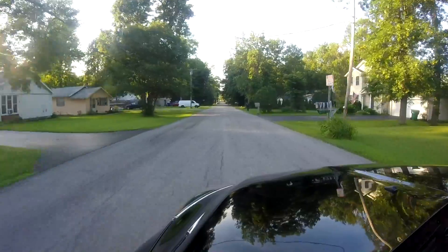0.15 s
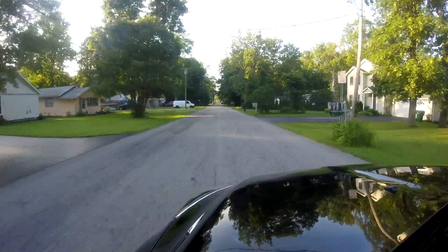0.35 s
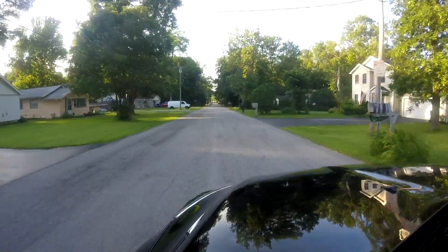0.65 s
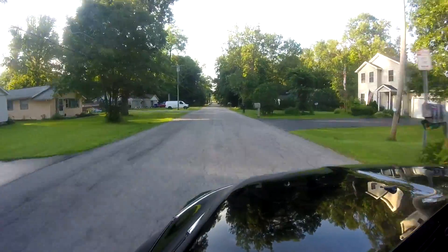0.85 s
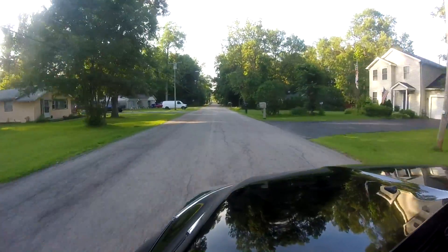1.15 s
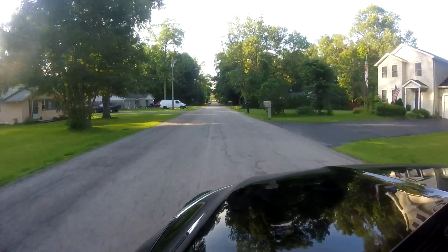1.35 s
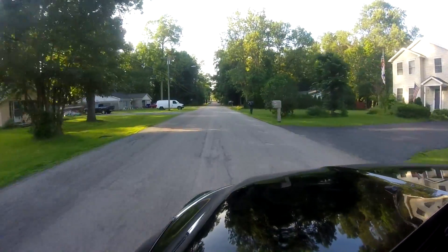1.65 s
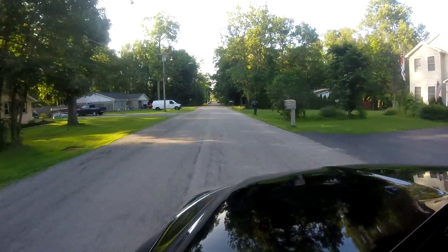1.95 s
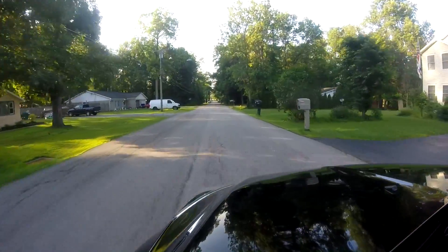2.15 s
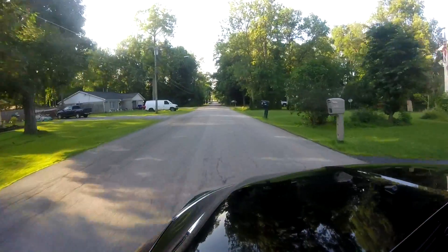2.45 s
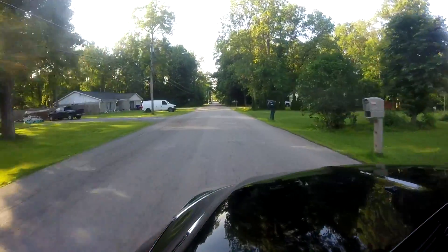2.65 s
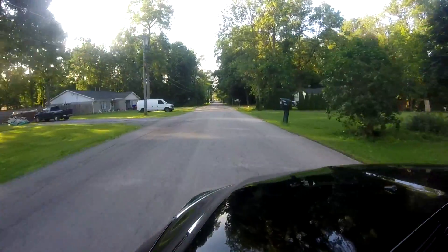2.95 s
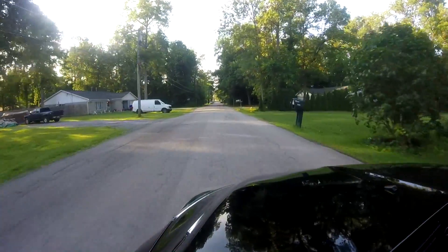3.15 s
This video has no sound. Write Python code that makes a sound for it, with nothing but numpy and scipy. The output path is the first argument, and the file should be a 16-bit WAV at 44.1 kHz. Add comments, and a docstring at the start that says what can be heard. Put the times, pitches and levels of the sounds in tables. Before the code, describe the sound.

A car engine accelerates hard along a quiet street, its intake roaring and turbo whistling upward. It backs off with a quick flutter, pops softly and settles into a lower drone. A microphone on the bodywork also catches wind and tyre noise.

```python
"""Turbo car pulling hard

Heard from a camera on the car's body, in a quiet street. Air gulped through the airbox roars and
the turbo whistles up; the throttle eases and boost spills back through the intake in short hoots.
The exhaust burbles down into the next gear; the firing harmonics drone on over tyre and wind noise."""
import sys
import numpy as np
from scipy import signal
from scipy.fft import rfft, irfft
from scipy.io import wavfile
from scipy.ndimage import uniform_filter1d

SR = 44100
rng = np.random.default_rng(int(sys.argv[2]) if len(sys.argv) > 2 else 0)


def put_to_file(sound):
    """Save the sound as 16-bit audio at rate SR, in the file named by the first command-line argument."""
    columns = np.atleast_2d(sound).T  # one column per channel
    safe = np.clip(columns, -1, 1)
    whole_steps = np.round(safe * 32767)
    wavfile.write(sys.argv[1], SR, whole_steps.astype(np.int16))


N = 145089
T = np.arange(N) / SR
HZ = np.fft.rfftfreq(N, 1 / SR)

# Cylinder firing (time [s], rate [Hz])
FIRING_HZ = [(0, 79.24), (.12, 80.77), (.37, 87.13), (.55, 93.3), (.77, 98.43), (1, 102.2), (1.2, 104.7),
             (2.1, 105.2), (2.25, 102.8), (2.5, 93.3), (2.6, 87.4), (2.75, 71.9), (2.87, 63.42),
             (3.06, 69.3), (3.18, 65.3), (3.29, 67.85)]
# Firing harmonics (time [s], 1st [dB], 2nd [dB], 3rd [dB])
HARMONICS_DB = [(0, -17.5, -20, -28.5), (.14, -16.5, -17, -31.5), (.4, -16, -22, -24.5),
                (.77, -19, -26, -33), (1.1, -22.5, -28, -26), (1.3, -36.5, -30, -29.5),
                (1.43, -23.5, -36, -47), (1.6, -18, -31, -34.5), (1.95, -18, -34, -52),
                (2.12, -18, -25, -26.5), (2.3, -23, -29, -37), (2.55, -18.5, -32, -52),
                (2.75, -18, -26, -34), (2.9, -16.5, -22, -30), (2.99, -23.5, -15, -24),
                (3.08, -27.5, -11, -22.5), (3.18, -18, -13, -22), (3.29, -17.5, -10.5, -22)]
# Other engine orders, throttle open (frequency [Hz], level re 3rd harmonic [dB])
ORDERS_OPEN_DB = [(120, -15), (265, -6.5), (335, -0.5), (375, 2), (405, -6), (450, -10), (500, -9.5),
                  (690, -11), (900, -24.5)]
# Other engine orders, throttle eased (frequency [Hz], level re 3rd harmonic [dB])
ORDERS_EASED_DB = [(120, -2), (270, -22), (335, -4), (395, -23.5), (470, -31.5), (560, -19), (680, -18.5),
                   (900, -29)]
# Intake envelopes before trim (time [s], roar [dB], hiss [dB])
INTAKE_DB = [(0, -40, -48), (.16, -27, -44), (.36, -23.5, -41), (.58, -20, -38), (0.88, -19, -37),
             (1.13, -19.5, -38), (1.24, -27, -46.5), (1.3, -22.5, -46), (1.32, -30, -47),
             (1.38, -25.5, -47), (1.42, -30.5, -43.5), (2.11, -30.5, -45.5), (2.57, -35, -51.5),
             (3.03, -36, -53.5), (3.065, -47.5, -56.5), (3.27, -50.5, -54.5)]
# Roar spectrum, throttle open (frequency [Hz], relative level [dB])
ROAR_OPEN_DB = [(250, 1.5), (430, 3), (520, -12), (700, 2.5), (810, -9.5), (940, -15), (1040, -7),
                (1300, -2), (1400, -7.5), (1750, 2), (2100, 0.5), (2400, -13), (2950, -20.5), (4500, -56)]
# Roar spectrum, throttle eased (frequency [Hz], relative level [dB])
ROAR_EASED_DB = [(250, -0.5), (560, 0.5), (700, 4), (850, -12.5), (1250, -5.5), (1400, -10.5), (1750, -2),
                 (2150, 2), (2450, -8.5), (2950, -18), (4500, -32.5)]
# Hiss spectrum (frequency [Hz], relative level [dB])
HISS_SPECTRUM_DB = [(2400, -14.5), (3300, 0.5), (4200, -1), (5300, -3), (6800, -6.5), (7850, -14),
                    (8550, -8.5), (9200, -17.5), (10500, -24), (14500, -38)]
# Airbox and pipe resonances (centre [Hz], half-width [Hz], lift open [dB], lift eased [dB])
DUCT_MODES = [(452, 7.7, 7.5, 7.5), (558, 12, 12, 8), (689, 16, 5, 6), (1016, 16, 10.5, 9),
              (1157, 36, 4.5, 4), (1255, 24, 9, 6), (1470, 28, 11, 12), (1697, 28, 4.5, 5.5),
              (1806, 40, 2, 2), (1990, 62, 3, -1.5), (2087, 18, 4, 6), (2595, 21, 4, 2.5),
              (3184, 36, 10, 11), (3388, 40, 9.5, 8), (3760, 110, 2, 7.5), (4110, 42, 6, 8.5),
              (4440, 51, 8, 2), (5254, 80, 10, 4.5), (6450, 50, 7, 0.5), (6600, 89, 4, 6)]
# Compressor (time [s], pitch [Hz], whistle [dB], rush before duct lift [dB])
TURBO_TRACK = [(0, 4120, -71, -49), (.1, 4420, -58, -47), (.22, 5150, -62, -45), (.42, 6210, -76, -49),
               (.47, 8070, -68, -67), (.52, 8250, -56, -66), (.66, 8630, -53, -70), (.77, 8900, -52, -71),
               (.93, 9000, -60, -67), (1.19, 8100, -51, -72), (1.25, 7770, -77, -72),
               (1.45, 6484, -65, -54), (1.7, 5354, -55, -65), (1.95, 4510, -62, -53),
               (2.07, 4175, -54, -43), (2.25, 4010, -49, -54), (2.62, 3454, -69, -66),
               (2.77, 3170, -49, -63), (2.87, 3028, -78, -74)]
# Tyre and wind rumble spectrum (frequency [Hz], relative level [dB])
RUMBLE_SPECTRUM_DB = [(10, -16), (28, 3.5), (60, 1.5), (100, -3), (140, -2), (200, -5.5), (270, -11),
                      (340, -12), (450, -14), (680, -22.5), (900, -30.5), (1250, -33.5), (4000, -48.5)]
# Rumble envelope (time [s], level [dB])
RUMBLE_DB = [(0, -21.5), (.4, -22), (.9, -18), (1.15, -20.5), (1.33, -24), (1.55, -23), (2, -19),
             (2.3, -18.5), (2.7, -19.5), (3.05, -20.5), (3.29, -20.5)]
# Spectrum of air over the body (frequency [Hz], relative level [dB])
WIND_SPECTRUM_DB = [(200, -12.5), (450, -3.5), (680, -2), (850, -13), (1250, -15), (1550, -19.5),
                    (2050, -10), (2400, -27), (7000, -41), (14000, -68)]
# Airbox whistles (centre [s], half-length [s], pitch [Hz], level [dB])
AIRBOX_CHIRPS = [(0.296, .032, 1477, -23.5), (0.381, 0.024, 1682, -23.5), (0.436, 0.015, 2020, -26)]
# Intake flutter (centre [s], half-length [s], pitch [Hz], level [dB])
FLUTTER_HOOTS = [(.85, 0.027, 423, -24), (.924, 0.021, 438.1, -13.5), (.963, 0.024, 426.6, -25),
                 (1.003, 0.02, 383.9, -21.5), (1.083, 0.034, 434.2, -15), (1.148, 0.0073, 415.3, -14),
                 (1.185, 0.019, 438.4, -12), (1.214, 0.013, 439.5, -8), (1.25, 0.0039, 431, -15),
                 (1.28, 0.018, 451, -15.5), (1.304, 0.0025, 460.7, -9.5), (1.319, 0.0068, 430, -12),
                 (1.366, 0.011, 395, -21), (1.404, 0.016, 449, -15)]
# Exhaust pops (onset [s], pitch [Hz], peak [dB])
EXHAUST_POPS = [(0.851, 87, -9.5), (2.174, 104.2, -4.5), (2.215, 136.3, -9.5), (2.255, 108, -5),
                (2.285, 136, -12.5), (2.375, 140.4, -7), (2.454, 122, -7), (2.733, 66.5, -12)]
# Pipe tones (centre [s], half-length [s], pitch [Hz], bandwidth [Hz], level [dB])
PIPE_TONES = [(1.295, 0.049, 520, 75, -25), (2.1, 0.45, 3750, 190, -44.5), (2.13, 0.3, 6685, 110, -54.5),
              (2.88, 0.12, 2220, 125.2, -39.5), (3.025, 0.031, 1900, 300, -38.5)]
# Air spits (centre [s], half-length [s], level [dB])
THROTTLE_SPITS = [(1.288, .018, -49.5), (1.37, 0.017, -46)]
# Spit spectrum (frequency [Hz], relative level [dB])
SPIT_SPECTRUM_DB = [(1000, -34), (5000, -10), (7000, -3), (8800, -6), (10000, -20), (14000, -29)]


def amp(db):
    """Decibels to gain."""
    return 10 ** (np.asarray(db) / 20)


def unit(x):
    """Scale to rms 1."""
    return x / np.sqrt(np.mean(x ** 2) + 1e-20)


def curves(table):
    """Value columns of a time table, per sample."""
    time_s, *columns = np.transpose(table)
    return [np.interp(T, time_s, column) for column in columns]


def colour(table, hz=HZ):
    """Spectrum in dB, interpolated over log frequency."""
    points_hz, db = np.transpose(table)
    return np.interp(np.log(hz + 1), np.log(points_hz), db)


def bell(x, centre, half_width):
    """Gaussian of height 1."""
    return np.exp(-((x - centre) / half_width) ** 2)


def drift(rate_hz):
    """Low-passed noise, rms 1."""
    size = 2 ** 18
    hz = np.fft.rfftfreq(size, 1 / SR)
    return unit(irfft(rfft(rng.standard_normal(size)) * bell(hz, 0, rate_hz))[:N])


def filtered(x, db):
    """Apply a gain per frequency bin."""
    return irfft(rfft(x) * amp(db), N)


def shaped(x, db):
    """Filter, then scale to rms 1."""
    return unit(filtered(x, db))


def fuzzy_tone(hz, width_hz):
    """Turbulence in one steady or moving resonance, rms 1."""
    phase = 2 * np.pi * np.cumsum(hz * np.ones(N)) / SR
    return unit(drift(width_hz / 2) * np.cos(phase) + drift(width_hz / 2) * np.sin(phase))


def throttle(when_open, when_eased, closing_s=(1.2, 1.7)):
    """Crossfade as the throttle closes."""
    eased = np.interp(T, closing_s, [0, 1])
    return (1 - eased) * when_open + eased * when_eased


def duct_lifts_db():
    """Intake pipe gain per bin; rows: open, eased."""
    return sum(np.outer(lifts_db, bell(HZ, hz, half_hz)) for hz, half_hz, *lifts_db in DUCT_MODES)


def engine(firings, half_order_db=-7, wobble_db=0.8):
    """Three firing harmonics, plus whole and half orders from uneven cylinders."""
    firing_hz, = curves(FIRING_HZ)
    levels_db = curves(HARMONICS_DB)
    out = sum(amp(db) * np.sin(2 * np.pi * k * firings) for k, db in enumerate(levels_db, 1))
    for order in [1.5, 2.5, *np.arange(3.5, 9, .5)]:
        hz = order * firing_hz
        db = levels_db[-1] + throttle(colour(ORDERS_OPEN_DB, hz), colour(ORDERS_EASED_DB, hz))
        db += half_order_db * (order % 1 > 0) + wobble_db * drift(14)
        out += amp(db) * np.cos(2 * np.pi * (order * firings + rng.random()))
    return np.sqrt(2) * out


def intake(firings, roar_trim_db=1, hiss_trim_db=2, ripple_db=2.5, ripple_width_hz=49.3):
    """Air gulped at each intake stroke roars and hisses through the airbox resonances."""
    ripple = unit(uniform_filter1d(rng.standard_normal(len(HZ)), round(ripple_width_hz * N / SR)))
    ducts_db = duct_lifts_db() + ripple_db * ripple * np.clip(HZ / 4000, 0, 1)
    airbox_db = ducts_db - 30 * bell(HZ, 0, 120) - 18 * np.clip(HZ / 4500 - 1, 0, 2)
    gulp = np.cos(2 * np.pi * firings) + 0.48 * drift(87)
    flow = rng.standard_normal(N) * np.exp(0.11 * gulp)
    roar = throttle(shaped(flow, colour(ROAR_OPEN_DB) + airbox_db[0]),
                    shaped(flow, colour(ROAR_EASED_DB) + airbox_db[1]))
    jet = rng.standard_normal(N) * np.exp(0.075 * gulp)
    jet_db = colour(HISS_SPECTRUM_DB) - 40 * bell(HZ, 0, 1800)
    hiss = throttle(*[shaped(jet, jet_db + db) for db in ducts_db])
    roar_db, hiss_db = curves(INTAKE_DB)
    return amp(roar_db + roar_trim_db) * roar + amp(hiss_db + hiss_trim_db) * hiss


def turbo(pitch_jitter=0.004, flicker_db=2.9):
    """A thin whistle tracks compressor speed; the air rushing with it rings the pipes."""
    hz, whistle_db, rush_db = curves(TURBO_TRACK)
    hz = uniform_filter1d(hz, SR // 16, mode="nearest")
    phase = 2 * np.pi * np.cumsum(hz * (1 + pitch_jitter * drift(90))) / SR
    rush = amp(rush_db) * fuzzy_tone(hz, width_hz=930)
    whistle = amp(whistle_db + flicker_db * drift(40)) * np.sqrt(2) * np.sin(phase)
    return whistle + throttle(*[filtered(rush, db) for db in duct_lifts_db()])


def rumble(lumps_db=2.0):
    """Lumpy low noise of tyres and wind."""
    level_db, = curves(RUMBLE_DB)
    spectrum_db = colour(RUMBLE_SPECTRUM_DB) - 40 * np.clip(HZ / 4000 - 1, 0, 1)
    return amp(level_db + lumps_db * drift(36)) * shaped(rng.standard_normal(N), spectrum_db)


def wind(start_db=-50.5, end_db=-36.5):
    """Air streams over the body, louder as the car gains speed."""
    stream = shaped(rng.standard_normal(N), colour(WIND_SPECTRUM_DB))
    return amp(np.linspace(start_db, end_db, N)) * stream


def airbox_chirps():
    """The opening throttle whistles up through the airbox resonances."""
    out = np.zeros(N)
    for centre_s, half_s, hz, db in AIRBOX_CHIRPS:
        tone = unit(np.sin(2 * np.pi * hz * T) + 0.4 * fuzzy_tone(hz, width_hz=110))
        out += amp(db) * bell(T, centre_s, half_s) * tone
    return out


def flutter(roughness=0.24, low_mode_hz=367.2, low_mode_db=-9):
    """Boost spills back through the intake, blowing its main and a lower resonance in hoots."""
    _, hz, _ = curves(FLUTTER_HOOTS)
    power = sum((amp(db) * bell(T, centre_s, half_s)) ** 2 for centre_s, half_s, _, db in FLUTTER_HOOTS)
    tone = np.sqrt(2) * np.sin(2 * np.pi * np.cumsum(hz) / SR)
    breath = roughness * fuzzy_tone(hz, width_hz=260)
    low_mode = amp(low_mode_db) * fuzzy_tone(low_mode_hz, width_hz=59)
    return np.sqrt(power) * (tone + breath + low_mode)


def exhaust(boom_hz=138.1, boom_db=-20, boom_s=2.55, boom_half_s=0.48, pop_rise_s=0.012):
    """Soft low pops and a pipe boom, mostly as the revs fall in the gear change."""
    out = amp(boom_db) * bell(T, boom_s, boom_half_s) * fuzzy_tone(boom_hz, width_hz=15.6)
    for onset_s, hz, db in EXHAUST_POPS:
        age_s = np.maximum(T - onset_s, 0)
        rise = age_s / pop_rise_s
        envelope = (rise * np.exp(1 - rise)) ** 2
        out += amp(db) * envelope * np.sin(2 * np.pi * hz * age_s)
    return out


def pipe_tones():
    """Intake pipes sing briefly as the flow sweeps past."""
    return sum(amp(db) * bell(T, centre_s, half_s) * fuzzy_tone(hz, width_hz)
               for centre_s, half_s, hz, width_hz, db in PIPE_TONES)


def spits():
    """Air spits at the closing throttle."""
    envelope = sum(amp(db) * bell(T, centre_s, half_s) for centre_s, half_s, db in THROTTLE_SPITS)
    return envelope * shaped(rng.standard_normal(N), colour(SPIT_SPECTRUM_DB))


def scene(speed_jitter=0.0022):
    """Mono mix; one crankshaft times engine and intake."""
    firing_hz, = curves(FIRING_HZ)
    firings = np.cumsum(firing_hz * (1 + speed_jitter * drift(8.6))) / SR
    running = engine(firings) + intake(firings) + turbo() + rumble() + wind()
    events = airbox_chirps() + flutter() + exhaust() + pipe_tones() + spits()
    return (running + events)[None]


def record(dry):
    """The camera's band limit."""
    cutoff_hz = 15100
    lowpass = signal.firwin(511, cutoff_hz, window=("kaiser", 9), fs=SR)
    return signal.oaconvolve(dry, lowpass[None], "same")


dry = scene()
out = record(dry)
put_to_file(out)
```